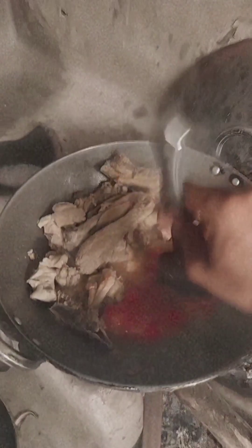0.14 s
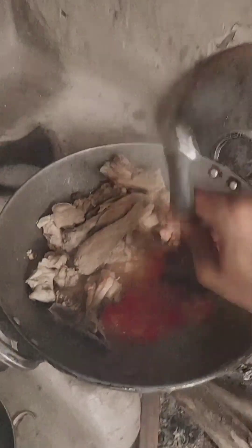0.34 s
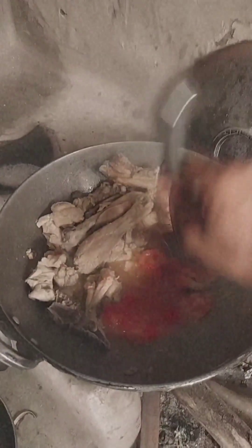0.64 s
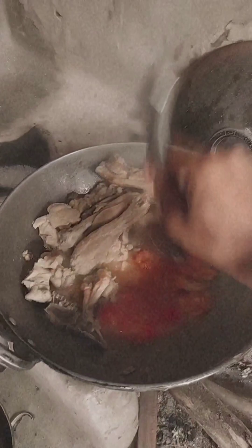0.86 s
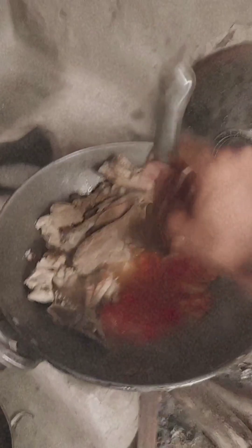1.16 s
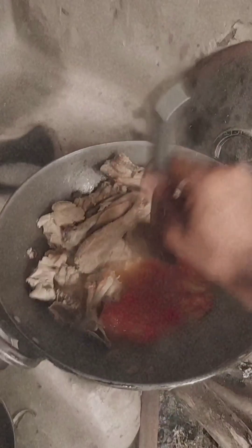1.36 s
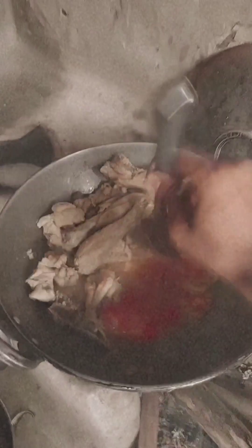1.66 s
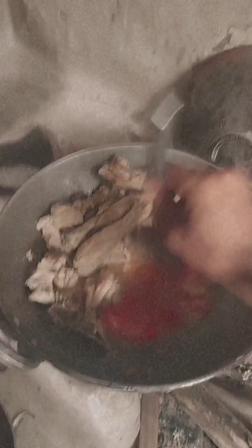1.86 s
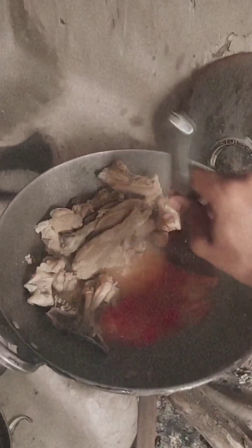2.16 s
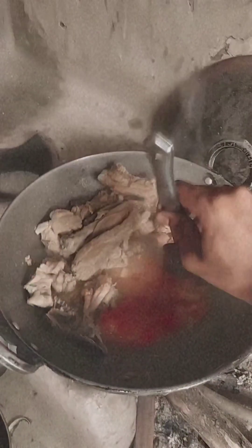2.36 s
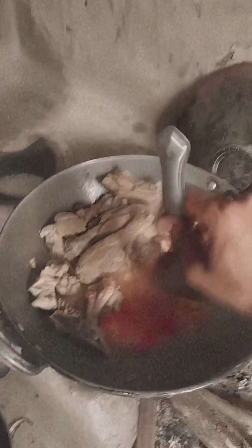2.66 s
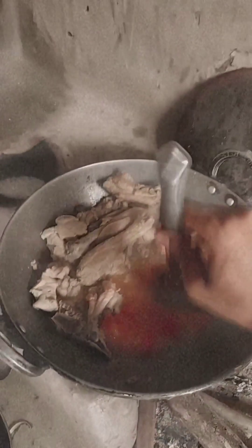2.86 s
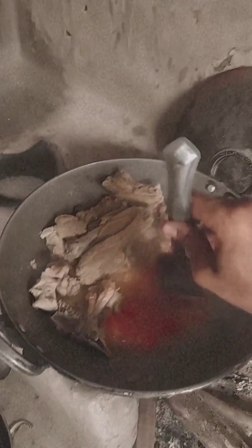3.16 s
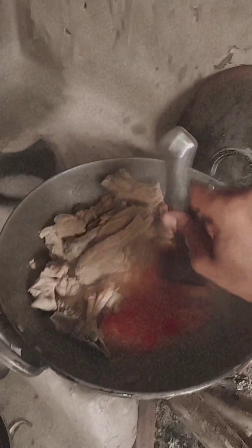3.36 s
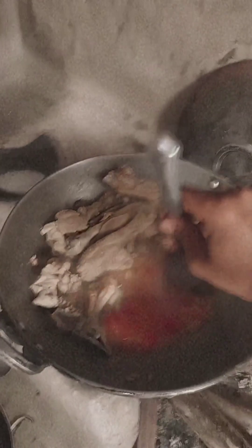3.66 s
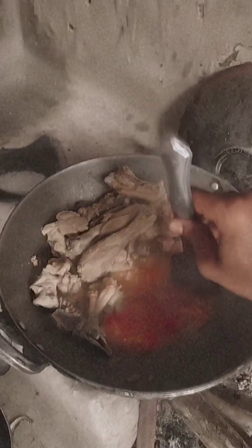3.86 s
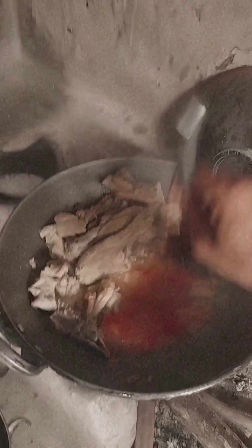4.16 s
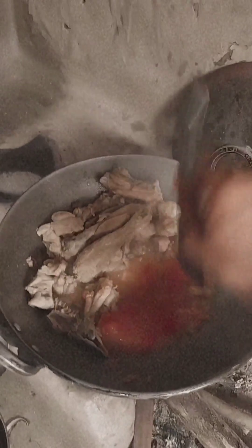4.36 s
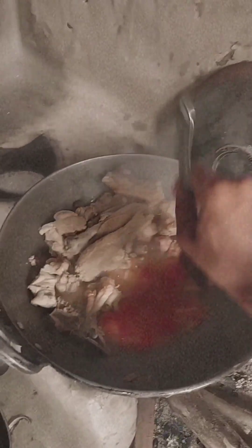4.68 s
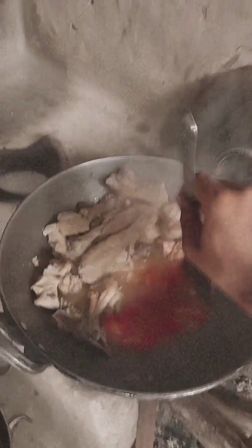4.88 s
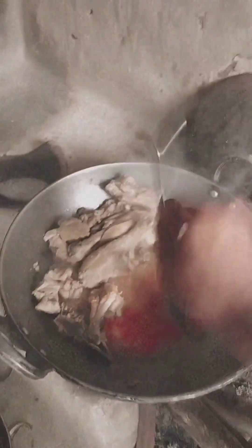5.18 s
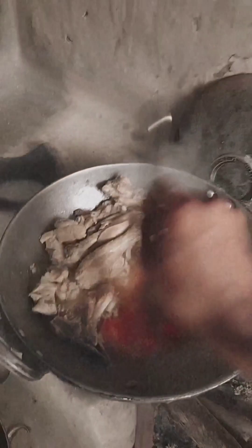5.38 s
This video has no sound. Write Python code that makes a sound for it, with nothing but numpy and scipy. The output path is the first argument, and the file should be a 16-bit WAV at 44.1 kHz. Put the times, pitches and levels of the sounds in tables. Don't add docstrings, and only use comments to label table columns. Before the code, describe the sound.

A close, nearly mono pickup in a small mud-walled room. A low fire murmur and very faint sizzle run throughout. From 0.15 s a steel spoon jabs into food in a metal pan: five hard, bright clanks roughly 0.2 s apart until 1.03 s, each a quick graze, crack and gritty skid with a short, food-damped ring, a slight low rocking of the pan and a soft room tail. Between 1.27 and 1.5 s come only faint touches and tiny fat spits. Jabs resume at 1.53 s and continue steadily to 4.1 s, strongest around 2.4-2.6 s, with a barely audible pressed bangle clink near 1.9 s and an occasional small bubble pop. From 4.2 to 4.8 s the spoon pauses; soft bubble pops and sharp spits crowd together, and a thin high bangle jingles at 4.52 s, fading. Three last jabs fall at 4.86, 5.03 and 5.26 s, leaving the fire.

```python
import sys
import numpy as np
from scipy import signal
from scipy.fft import rfft, irfft
from scipy.io import wavfile

SR = 44100
rng = np.random.default_rng(int(sys.argv[2]) if len(sys.argv) > 2 else 0)


def how_loud(loudness_db):
    steps = np.asarray(loudness_db, float) / 20
    return 10 ** steps


def generate_wav(sig):
    pcm = np.round(np.clip(np.atleast_2d(sig).T, -1, 1) * 32767).astype(np.int16)
    wavfile.write(sys.argv[1], SR, pcm)


N = 243873
BITE_S = 0.005
SQUARE_LEAD_S = 0.0008


def at_hz(points, hz):
    table_hz, values = np.transpose(points)
    return np.interp(np.log(hz), np.log(table_hz), values)


def coloured(x, spectrum):
    hz = np.maximum(np.fft.rfftfreq(len(x), 1 / SR), 1)
    return irfft(rfft(x) * how_loud(at_hz(spectrum, hz)), len(x))


def rms_one(x):
    return x / np.sqrt(np.mean(x ** 2) + 1e-20)


def rings(hz, t60, seconds):
    t = np.arange(int(seconds * SR)) / SR
    decay = how_loud(-60 * np.outer(1 / np.maximum(t60, 0.004), t))
    return np.sin(2 * np.pi * np.outer(hz, t)) * decay


def add(out, sound, s, peak_db):
    i = int(s * SR)
    piece = sound[:N - i]
    out[i:i + len(piece)] += piece * how_loud(peak_db) / np.max(np.abs(sound))


# t/s, peak level/dB, skid/s, edge-on/dB (brightening by the spoon's edge), clang/dB (drive of the strong mode)
JABS = [(0.154, -9, 0.0059, 0, -3.5), (0.379, -10, 0.0085, 0.5, -1.5), (0.585, -9.5, 0.0017, 1.5, -0.5),
        (0.782, -10, 0.0069, -2, 2), (1.026, -8.5, 0.0091, -6, 1.5), (1.532, -8, 0.0062, -4.5, 1.5),
        (1.789, -13.5, 0.0039, -6, 3), (2.008, -10, 0.0017, -1, 0.5), (2.191, -10.5, 0.007, 2.5, -2),
        (2.395, -7.5, 0.005, 0.5, -0.5), (2.574, -7, 0.0034, 1, 0.5), (2.749, -10.5, 0.0077, 0.5, -3),
        (2.923, -11.5, 0.01, 2.5, 1.5), (3.097, -9, 0.0058, 0.5, -2), (3.273, -11, 0.0086, 2, -7),
        (3.471, -10.5, 0.0012, -1, 1.5), (3.686, -9.5, 0.0072, 0, 0), (3.872, -11.5, 0.0095, 1.5, -1.5),
        (4.103, -10.5, 0.0046, 1, 0.5), (4.86, -10.5, 0.0077, -0.5, 1), (5.031, -10.5, 0.01, -1.5, 0.5),
        (5.257, -11, 0.0077, -0.5, -1.5)]
GRAZES = {0.154: .0045, 0.782: .0035, 1.532: .0033, 1.789: .0033, 2.008: .0033, 2.749: .0028, 2.923: .0024,
          3.097: .0045, 5.031: .0028}


def jabs():
    out = np.zeros(N)
    for s, peak_db, skid_s, edge_db, clang_db in JABS:
        lead_s = next((lead for at, lead in GRAZES.items() if abs(at - s) < 0.01), SQUARE_LEAD_S)
        add(out, jab(skid_s, edge_db, clang_db, lead_s), s - BITE_S, peak_db + 4.5)
        add(out, rocking(), s, peak_db - 34 + rng.normal(0, 2.4))
    return out


# f/Hz, level/dB, t60/s
PAN_MODES = [(263, -6, .06), (338, 2, .06), (385, -5, .05), (505, -3, .06), (535, 3, .07), (588, -2, .06),
             (800, -8, .05), (1040, -2, .05), (1213, -8, .05), (1570, -8, .045), (1856, 11, .045),
             (2091, 0, .045),
             (2644, 0.5, 0.015), (2869, 0, 0.039), (3270, -28, 0.1), (3360, -11, 0.17), (3854, -1.5, 0.042),
        (4093, -1.5, 0.085), (4691, 8.5, 0.017), (4637, -3.5, 0.025), (8100, -12.5, 0.057)]
# f/Hz, level/dB, slope/(dB per dB edge-on), slope/(dB per dB clang)
LANDING = [(434, -1.5, 0.08, 0.4), (1020, -1, -0.58, 0.06), (1760, -4, 0.5, 1), (2830, 3, -0.34, 0.7),
           (4410, -0.04, 0, 0), (8500, -4.5, 1, 0.5)]


def jab(skid_s, edge_db, clang_db, lead_s):
    under_spoon = (3485 * 2 ** (0.33 * edge_db), -5.5 - edge_db, 0.08)
    hz, level_db, t60 = np.transpose(PAN_MODES + [under_spoon])
    thud_db = 350 * (skid_s - 0.008)
    spot = [(f, db + per_edge * edge_db + per_clang * clang_db + (f < 500) * thud_db)
            for f, db, per_edge, per_clang in LANDING]

    chance_db, sign = rng.normal(0, 2.2, len(hz)), rng.choice([-1, 1], len(hz))
    spread = np.append(np.full(len(hz) - 1, 0.006), 0.101)
    hz = hz * np.exp(spread * rng.standard_normal(len(hz)))
    strength = how_loud(level_db + at_hz(spot, hz) + chance_db) * sign
    longest_s = np.where(hz > 3000, 0.14, 0.06)
    modes = rings(hz, np.minimum(t60, longest_s), 0.2 - BITE_S)
    chatter = rng.standard_normal(900)
    clear = signal.fftconvolve(strength @ modes, skid(skid_s, chatter))[:modes.shape[1]]

    band_hz, bands = crowd(skid_s, 0.73, lead_s)
    lump = np.arange(bands.shape[1]) / SR / 0.002475
    rattle_db = 2.5 * np.interp(lump, np.arange(len(chatter)), chatter)
    sparse_db = -13 / (1 + (band_hz / 1100) ** 4)
    sound = how_loud(at_hz(spot, band_hz) + sparse_db) @ (bands * how_loud(rattle_db))
    sound[-len(clear):] += how_loud(-15.5) * clear
    return signal.sosfilt(signal.butter(4, 215, "high", fs=SR, output="sos"), sound)


def skid(seconds, chance):
    t = np.arange(len(chance)) / SR
    force = 0.03 * chance * np.exp(-t / max(seconds, 0.001))
    force[0] = 1
    return force


# f/Hz, level/(dB per Hz)
CROWD = [(71, -46), (120, -15), (326, 9), (684, 0), (819, 3.5), (1550, -1), (1860, 1.5), (2370, -7),
         (3330, -6.5), (6310, -9), (9040, -2), (13000, -25), (14300, -27)]
# f/Hz, t60/s
CROWD_T60 = [(200, 0.22), (530, 0.15), (1390, 0.089), (3680, 0.11), (9700, 0.086)]


def crowd(skid_s, graze_share, lead_s):
    t = np.arange(int(0.2 * SR)) / SR
    hz = 125 * 2 ** np.arange(0, 7, 1 / 3)
    column_hz = hz[:, None]
    bins = np.maximum(np.fft.rfftfreq(len(t), 1 / SR), 1)
    share = np.cos(np.pi / 2 * np.clip(3 * np.log2(bins / column_hz), -1, 1)) ** 2
    noise = rfft(rng.standard_normal(len(t)))
    bands = irfft(noise * share * how_loud(at_hz(CROWD, bins)), len(t))

    graze_start = BITE_S - lead_s
    rise = np.clip(0.55 + (t - graze_start) / lead_s, 0, 1) * (t > graze_start)
    graze = graze_share * rise / (1 + (5600 / column_hz) ** 5.6)
    since = np.maximum(t - BITE_S, 0)
    crack = 1 + 1.8 * np.exp(-since / 0.0012)
    bite = (1 - np.exp(-since * column_hz * 0.31)) * crack
    decay = how_loud(-60 * np.maximum(since - skid_s, 0) / at_hz(CROWD_T60, hz)[:, None])
    return hz, bands * (graze + bite) * decay


def rocking():
    t = np.arange(int(0.15 * SR)) / SR
    slide_s = 0.0362 * how_loud(rng.normal(0, 3.01))
    hz = 45 + 260 * np.exp(-t / slide_s)
    rough = np.interp(t, np.arange(20) / 120, 1 + 0.9 * rng.standard_normal(20))
    slide = rough * np.sin(2 * np.pi * np.cumsum(hz) / SR + 2 * np.pi * rng.random())
    jolt = 0.91 * np.sin(2 * np.pi * 28 * t)
    return (slide + jolt) * t * np.exp(-t / 0.02)


# t/s, peak level/dB
TOUCHES = [(1.272, -38), (1.288, -40), (1.307, -48), (1.433, -48), (1.762, -36), (1.774, -38), (1.957, -47),
           (4.079, -46), (4.709, -46), (4.728, -44), (4.745, -48), (4.806, -50)]


def touches():
    out = np.zeros(N)
    for s, peak_db in TOUCHES:
        hz, bands = crowd(0.004, 0.1, SQUARE_LEAD_S)
        treble_db = -5 * np.log2(1 + (hz / 2600) ** 2)
        bass_db = -3 * np.log2(1 + (900 / hz) ** 2)
        add(out, how_loud(treble_db + bass_db) @ bands, s - BITE_S, peak_db)
    return out


# t/s, peak level/dB
JINGLES = [
    (4.516, -35),
    (4.525, -24),
    (4.536, -33),
    (4.548, -33),
    (4.575, -43),
    (4.61, -44),
    (4.66, -50),
]
# f/Hz, level/dB, t60/s
BANGLE = [(9850, -6, 0.1), (10320, -1, 0.085), (10030, 3, 0.13), (10500, -5, 0.1), (12270, 0, .13),
          (12650, -12, .06)]
# t/s, peak level/dB
PRESSED_JINGLES = [
    (1.8896, -46),
    (1.9101, -41.5),
    (1.9344, -46),
]
# f/Hz, level/dB, t60/s
PRESSED_BANGLE = [(9300, -6, .07), (9460, 0, .12), (9700, -5, .07), (10200, -5, .09), (12000, -12, .1)]


def bangle(clinks, modes):
    hz, level_db, t60 = np.transpose(modes)
    out, t = np.zeros(N), np.arange(int(0.4 * SR)) / SR
    for s, peak_db in clinks:
        waver = [np.interp(t, np.arange(100) / 260, 1 + 0.8 * rng.standard_normal(100)) for _ in hz]
        ringing = rings(hz, t60, 0.4) * waver * (1 - np.exp(-t / 0.0011))
        strength = how_loud(level_db + rng.normal(0, 6.5, len(hz)))
        add(out, strength @ ringing, s, peak_db)
    return out


# t/s, peak level/dB, f/Hz
POPS = [(2.13, -45, 2070), (3.054, -57, 1900), (3.8472, -59, 1860), (4.2114, -49, 1940),
        (4.2936, -52, 1940), (4.344, -46, 1990), (4.3766, -50, 1930), (4.414, -55, 2120),
        (4.4837, -43.5, 2140), (4.5605, -54, 2240), (4.5984, -50, 2100), (4.7104, -56, 1530),
        (4.7262, -45, 1770), (4.7465, -51, 1690), (4.808, -54, 1780), (5.1891, -43.5, 2010)]


def pops():
    out = np.zeros(N)
    for s, peak_db, hz in POPS:
        ring = rings([hz], np.array([0.03]), 0.06)[0]
        add(out, np.convolve(ring, np.hanning(9)), s, peak_db + 1.5)
    return out


# t/s, peak level/dB, f/Hz
SPITS = [(1.2785, -50, 9300), (1.2944, -49, 9340), (1.3394, -55, 4560), (1.4182, -50, 9200),
         (1.4566, -50, 8930), (1.483, -49, 5670), (4.2344, -48, 4600), (4.3194, -65, 4100),
         (4.3754, -60, 8290), (4.3844, -57, 5950), (4.4288, -45, 9350), (4.4573, -50, 8700),
         (4.478, -43, 9050), (4.4194, -51, 5130), (4.595, -48, 6150), (4.6114, -50, 7930),
         (4.6518, -47, 6540), (4.6644, -48, 5920), (4.6924, -52, 7350), (4.7444, -56, 8200),
         (4.7755, -52, 4950), (4.8, -53, 7880), (4.8279, -50, 8500)]


def spits():
    out = np.zeros(N)
    for s, peak_db, hz in SPITS:
        puff = rng.standard_normal(260) * np.hanning(260)
        ring = rings([hz], np.array([14 / hz]), 0.01)[0]
        add(out, np.convolve(ring, puff), s - 0.002, peak_db + 0.5)
    return out


# f/Hz, t60/s
ROOM_T60 = [(120, 0.34), (300, 0.2), (1000, 0.27), (4000, 0.52), (8000, 0.48), (13000, 0.11)]
# f/Hz, level/dB under the direct sound
ROOM_DB = [(120, -8), (300, -10), (1000, -25.5), (2000, -32), (4000, -21.5), (8000, -21), (13000, -7.5)]


def room(x):
    t, tail = np.arange(int(0.7 * SR)) / SR, 0
    for hz in 125 * 2. ** np.arange(8):
        edges = [hz / np.sqrt(2), min(hz * np.sqrt(2), 0.45 * SR)]
        band = signal.butter(2, edges, "band", fs=SR, output="sos")
        noise = signal.sosfilt(band, rng.standard_normal(len(t)))
        tail = tail + noise * how_loud(at_hz(ROOM_DB, hz) - 60 * t / at_hz(ROOM_T60, hz))
    build = 1 - np.exp(-t / 0.017)
    return signal.fftconvolve(x, 0.067 * tail * build)[:N]


# f/Hz, level/(dB per Hz)
FIRE = [(20, 5), (60, 0), (130, -5.5), (250, -0.5), (500, -4.5), (1000, -7), (2000, -7), (2800, -17.5),
        (5000, -22.5), (9500, -15), (11500, -27), (13500, -17), (14500, -30)]
# t/s, level/dB
SIMMER = [(0.0, -55.5), (0.5, -59), (1.02, -61), (1.31, -70), (1.91, -65), (2.26, -66), (2.97, -63),
          (4.1, -63), (4.77, -71), (5.05, -69), (5.53, -63)]


def fire():
    s, sizzle_db = np.transpose(SIMMER)
    t = np.arange(N) / SR
    murmur_db = -54 + 0.033 * (sizzle_db + 49)
    flutter_db = 1.3 * np.interp(t, np.arange(200) / 25, rng.standard_normal(200))
    murmur = rms_one(coloured(rng.standard_normal(N), FIRE))
    murmur = murmur * how_loud(np.interp(t, s, murmur_db) + flutter_db)

    struck = rng.random(N) < 2500 / SR
    size_db = 2.5 * np.minimum(rng.exponential(1, N), 4)
    grains = struck * how_loud(size_db) * rng.choice([-1, 1], N)
    pitches, dealt = np.geomspace(2600, 10500, 10), rng.integers(0, 10, N)
    shapes = rings(pitches, 22 / pitches, 0.02)
    sizzle = sum(signal.oaconvolve(grains * (dealt == k), shape)[:N] for k, shape in enumerate(shapes))
    sizzle = rms_one(sizzle) * how_loud(np.interp(t, s, sizzle_db))
    dull = signal.butter(6, 11500, fs=SR, output="sos")
    return signal.sosfilt(dull, murmur + sizzle)


def port_difference(mid):
    side, edges = 0, np.geomspace(4700, 14000, 8)
    for low, high in zip(edges, edges[1:]):
        band = signal.sosfilt(signal.butter(4, [low, high], "band", fs=SR, output="sos"), mid)
        patch = rng.random(130) < 0.22 + 0.3 * (low > 9500)
        restless = patch.repeat(10) * rng.standard_normal(1300)
        side = side + band * np.interp(np.arange(N) / SR, np.arange(1300) / 215, restless)
    return how_loud(-7) * side


def scene():
    near = jabs() + touches() + pops() + spits()
    near += bangle(JINGLES, BANGLE) + bangle(PRESSED_JINGLES, PRESSED_BANGLE)
    moving = np.interp(np.arange(N) / SR, np.arange(900) / 150, rng.standard_normal(900))
    mid = near + room(near * (0.39 + 0.86 * moving)) + fire()
    side = port_difference(mid)
    return np.array([mid + side, mid - side])


def top_cut(x):
    return signal.sosfilt(signal.butter(12, 15400, fs=SR, output="sos"), x)


def record(dry):
    rounded = 0.86 * np.tanh(dry / 0.91)
    steep = signal.cheby2(10, 17, 14100, fs=SR, output="sos")
    mix = signal.sosfilt(steep, rounded)
    return top_cut(mix)


dry = scene()
out = record(dry)
generate_wav(out)
```